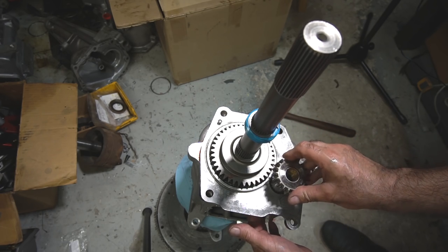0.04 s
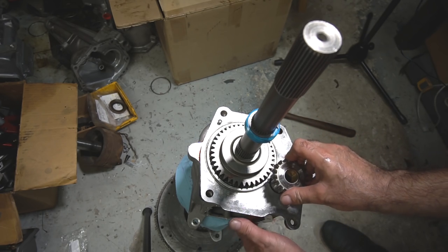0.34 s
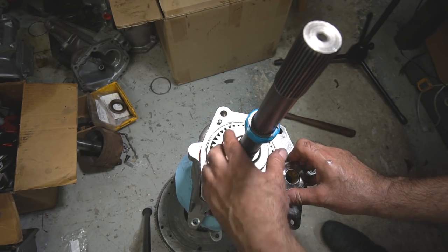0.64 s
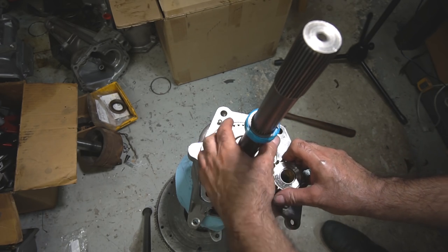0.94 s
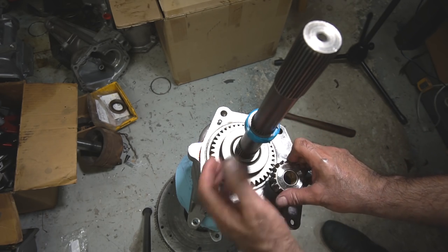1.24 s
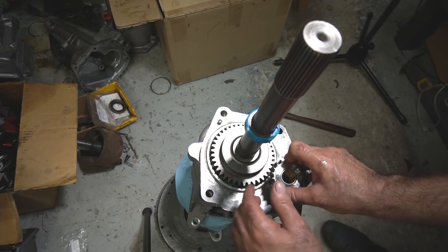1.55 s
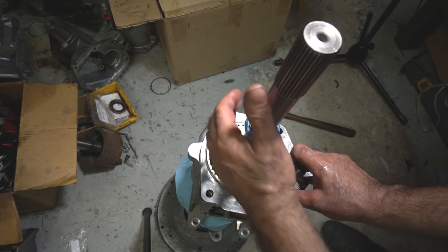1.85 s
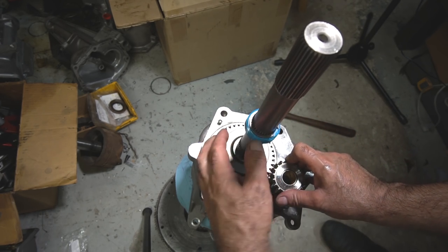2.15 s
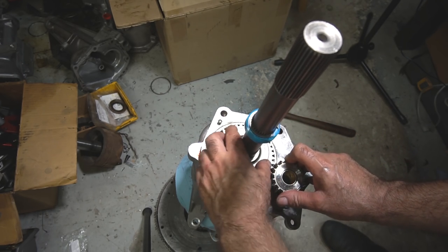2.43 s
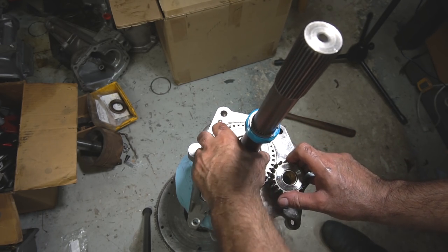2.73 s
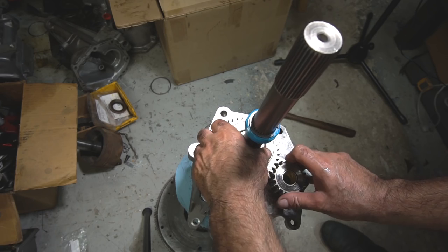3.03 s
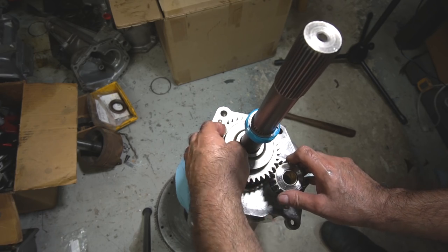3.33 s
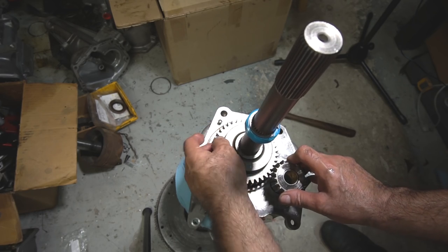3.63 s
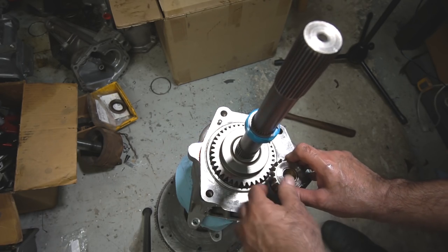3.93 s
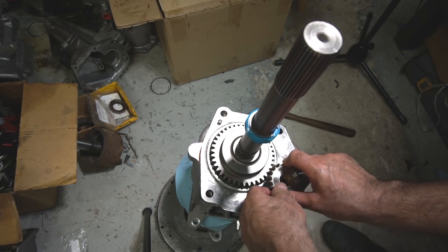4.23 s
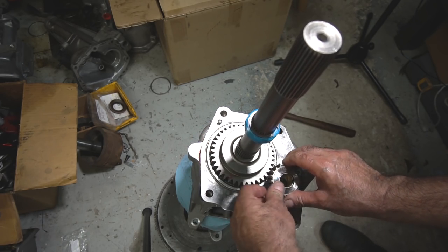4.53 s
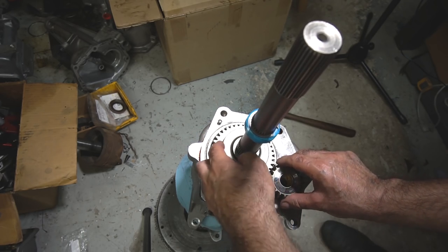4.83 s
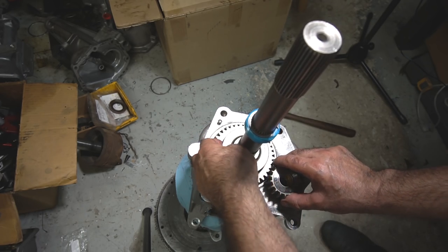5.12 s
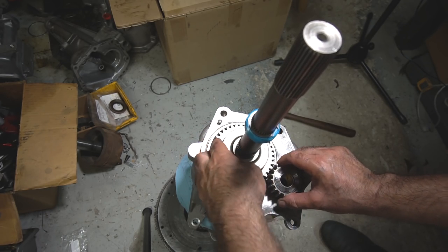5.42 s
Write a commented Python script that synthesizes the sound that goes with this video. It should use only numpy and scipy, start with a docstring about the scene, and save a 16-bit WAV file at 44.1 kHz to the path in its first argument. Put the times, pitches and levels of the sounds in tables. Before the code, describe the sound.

Close by in a quiet workshop, hands work a big steel gear and a small pinion into mesh. Teeth clack and chatter in irregular clusters, briefly ringing the metal housing, with light pings, ticks and dull bumps between. Midway the gear scrapes along its shaft amid a flurry of knocks. The two loudest clacks follow with a faint chime, then a few lighter knocks, over a low hush of air.

```python
"""A short scrape and a flurry of steel knocks, close by: hands work a big gear and a small pinion into mesh.
Teeth clack and chatter, ringing the cast housing and thudding in its stand; the pinion pings, tips tick.
The big gear grinds along its shaft in tiny slips and chimes faintly, shorter when a palm lies on it.
Hands rumble, bump and rub on the metal. The workshop answers the harder knocks over a low hush of air."""
import sys
import numpy as np
from scipy import signal
from scipy.fft import rfft, irfft, next_fast_len
from scipy.io import wavfile

SR = 44100
rng = np.random.default_rng(int(sys.argv[2]) if len(sys.argv) > 2 else 0)


def unload_wav(signal):
    """Save mono or channel-first audio to the path in sys.argv[1] as 16-bit WAV at rate SR, clipped to [-1, 1]."""
    wavfile.write(
        sys.argv[1],
        SR,
        np.round(np.clip(np.atleast_2d(signal).T, -1, 1) * 32767).astype(np.int16),
    )


N = 250047
TIME = np.arange(N) / SR
BLOW = TIME[:SR // 2]   # time since a contact [s]

# modes of the housing's walls (frequency [Hz], level [dB], t60 [s])
HOUSING_MODES = [(752, 1, 0.23), (922, 12.5, 0.029), (1020, -3, 0.14), (1122, 2.5, 0.053),
                 (1182, 7.5, 0.0086), (1370, -16, 0.084), (1596, 5.5, 0.056), (1842, -7.5, 0.069),
                 (2310, -36, 0.048), (2217, 9, 0.019), (2780, -6, 0.15), (3070, -12, 0.062),
                 (3920, 13, 0.026), (4094, 11, 0.042), (4850, 3, 0.034), (5500, -18, .04)]
# modes of the big gear (frequency [Hz], level [dB], t60 [s])
GEAR_MODES = [(6385, 8.5, 0.16), (6470, -6.5, 0.4), (10300, -2, 0.13), (10130, -13, 0.4), (12305, -1, 0.47),
              (12330, -9, 0.43), (13980, -18, .35), (14545, -23, .3)]


def from_db(db):
    """Decibels to gain."""
    return 10 ** (np.asarray(db) / 20)


def rms_one(x, span_s=None):
    """Scale to rms 1, judged over the first span_s if given."""
    head = x if span_s is None else x[:int(span_s * SR)]
    return x / np.sqrt(np.mean(head ** 2) + 1e-20)


def unit(x):
    """Scale to energy 1."""
    return x / np.sqrt(np.sum(x ** 2) + 1e-20)


def add(track, s, sound):
    """Mix a sound in at time s."""
    at = max(int(s * SR), 0)
    track[at:at + len(sound)] += sound[:N - at]


def through(x, response):
    """Play x through an impulse response."""
    return signal.fftconvolve(x, response)[:len(x)]


def colour(x, spectrum):
    """Shape x with an EQ curve, rolled off below its first point; rms 1."""
    hz, db = np.transpose(spectrum)
    grid = np.fft.rfftfreq(next_fast_len(len(x)) * 2, 1 / SR) + 1
    gain = from_db(np.interp(np.log(grid), np.log(hz), db)) * np.minimum(grid / hz[0], 1) ** 2
    return rms_one(irfft(rfft(x, 2 * len(grid) - 2) * gain)[:len(x)])


def band(x, low_hz, high_hz, order=4):
    """Keep the band between two edges."""
    sos = signal.butter(order, [low_hz, min(high_hz, .45 * SR)], "band", fs=SR, output="sos")
    return signal.sosfilt(sos, x + 1e-18)


def resonate(x, hz, width_hz):
    """A two-pole resonance."""
    r = np.exp(-np.pi * width_hz / SR)
    feedback = [1, -2 * r * np.cos(2 * np.pi * hz / SR), r * r]
    return signal.lfilter([(1 - r * r) / 2, 0, (r * r - 1) / 2], feedback, x + 1e-18)


def fade(t60, t=BLOW):
    """Exponential decay, 60 dB down after t60 seconds."""
    return np.exp(-np.log(1000) * t / max(t60, 1e-4))


def ring(modes, tilt_db=0):
    """Struck modes, tilted by tilt_db per octave; each blow lands elsewhere and shifts their balance."""
    chance = rng.standard_normal((len(modes), 2))
    out = 0
    for (hz, db, t60), (stray, polarity) in zip(modes, chance):
        gain = from_db(db + 2 * stray + tilt_db * np.log2(hz / modes[0][0])) * np.sign(polarity)
        out += gain * fade(t60) * np.sin(2 * np.pi * hz * BLOW)
    return unit(out)


def rattle(t60):
    """A crowd of close modes dying together."""
    return unit(rng.standard_normal(len(BLOW)) * fade(t60))


def pulse(hz, width_hz):
    """A contact: damped cycles that swell and die, briefer as the band widens."""
    return unit(resonate(resonate(signal.unit_impulse(len(BLOW)), hz, width_hz), hz, width_hz))


def grains(per_s, spread_db):
    """Tiny slips at random moments, their sizes scattered by spread_db."""
    return (rng.random(N) < per_s / SR) * rng.choice([-1, 1], N) * from_db(spread_db * rng.standard_normal(N))


def arch(s, length_s, power):
    """A movement of the hand speeds up and slows down again."""
    phase = np.clip((TIME - s) / length_s, 0, 1)
    return np.sin(np.pi * phase) ** power


def gear_slide():
    """The bore drags over the shaft in many small slips; the casing drones and the gear sings faintly."""
    # pushes along the shaft (start [s], length [s], grind level [dB], drone level [dB])
    strokes = [(0, 0.053, -42.5, -42), (0.947, 0.13, -45, -43), (2.84, 0.12, -29, -38),
               (2.901, 0.11, -28, -35.5), (3.483, 0.09, -44.5, -34.5), (3.561, 0.051, -41, -33.5),
               (3.768, 0.096, -35.5, -33.5)]
    # tone of the grinding bore and of the droning casing (frequency [Hz], level [dB])
    grind_eq = [(450, -3), (650, -9), (950, -0.5), (1300, -4), (1750, -3.5), (2300, -14.5), (3200, -28.5),
                (5000, -32), (9000, -45), (16000, -50)]
    drone_eq = [(120, -19), (210, -12.5), (290, 0.5), (340, 7), (420, -3.5), (560, -14.5), (1000, -10),
                (1800, -25), (3000, -29), (6000, -52)]
    drag = sum(from_db(db) * arch(s, length_s, power=1.8) for s, length_s, db, _ in strokes)
    shake = sum(from_db(db) * arch(s, length_s, power=0.8) for s, length_s, _, db in strokes)
    slips = grains(7000, spread_db=2.5)
    walls = through(slips, ring(HOUSING_MODES))
    grind = colour(slips, grind_eq) + from_db(-8.5) * colour(walls, grind_eq)
    drone = colour(grains(4000, spread_db=2.5), drone_eq)
    # firm dragging wakes the gear's lowest modes and chokes its highest
    loose = 1 / (1 + (drag / from_db(-32.5)) ** 2)
    low_song = through(drag * rms_one(slips), ring(GEAR_MODES, tilt_db=-18))
    high_song = through(loose * shake * rms_one(slips), ring(GEAR_MODES, tilt_db=16))
    return drag * grind + shake * drone + from_db(-28) * low_song + from_db(-39) * high_song


def hands():
    """Fingers nudge the casing into a rumble and skin rubs over oily steel."""
    # swell of the rumble under the grip (time [s], relative level [dB])
    grip = [(0.0, -46.5), (0.12, -51), (0.98, -57), (1.2, -50.5), (1.37, -63.5), (2.59, -64), (2.91, -48),
            (3.14, -69), (3.38, -68), (3.92, -42), (4.56, -59.5), (5.26, -63), (5.54, -59.5), (5.67, -60)]
    # strokes of skin on steel (start [s], length [s], level [dB])
    rubs = [(.74, 0.11, -65.5), (0.922, 0.15, -57), (2.397, 0.35, -60.5), (3.29, 0.055, -54),
            (4.97, 0.23, -61)]
    # tone of the rumbling casing and of the rubbing skin (frequency [Hz], level [dB])
    rumble_eq = [(120, -43.5), (210, -8.5), (290, -7.5), (340, 0.5), (410, -8), (520, -15.5), (1000, -19.5),
                 (1700, -24), (3000, -30), (6000, -55)]
    skin_eq = [(1000, -7), (2000, 8.5), (3500, 3), (6000, -3.5), (10000, -1.5), (16000, -21)]
    grip_db = np.interp(TIME, *np.transpose(grip))
    rumble = from_db(grip_db + 1.5) * colour(grains(900, spread_db=0), rumble_eq)
    rubbing = sum(from_db(db) * arch(s, length_s, power=.9) for s, length_s, db in rubs)
    return rumble + rubbing * colour(grains(2700, spread_db=6.5), skin_eq)


def still_air():
    """The workshop's steady, bass-heavy hush."""
    # room tone (frequency [Hz], level [dB])
    air_eq = [(12, -68), (20, 8), (65, -4), (138, -14), (216, -21.5), (357, -20), (624, -26), (738, -32),
              (873, -29), (1290, -30.5), (1440, -32.5), (1860, -32.5), (2750, -38), (3740, -38),
              (16000, -44)]
    return from_db(-45.5) * colour(rng.standard_normal(N), air_eq)


def chatter(length_s, skips):
    """A clean blow is one touch; a glancing one skips several times within length_s."""
    touches = signal.unit_impulse(len(BLOW))
    jitter = rng.random(skips)
    sizes = rng.uniform(1.0, 1.3, skips) * rng.choice([-1, 1], skips)
    if length_s > .001:
        skip_s = (np.arange(skips) + jitter) / skips * length_s
        touches[(skip_s * SR).astype(int) + 1] = sizes
    return touches


def strike(touches, hz, width_hz, modes_db, crowd_db, crowd_t60):
    """Contact pulses and the housing ringing after them."""
    contact = unit(through(touches, pulse(hz, width_hz)))
    modes = unit(through(contact, ring(HOUSING_MODES)))
    crowd = unit(through(contact, rattle(crowd_t60)))
    return contact + from_db(modes_db) * modes + from_db(crowd_db) * crowd


def palm_on_gear(s):
    """Whether a palm muffles the big gear at time s."""
    # spells under the palm (start [s], end [s])
    holds = [(.7, 1.08), (1.7, 3.75), (4.7, 5.67)]
    return any(start <= s < end for start, end in holds)


def tooth_knocks():
    """Steel teeth collide with a clack, a bite, a crack and a thud; returns direct sound and room send."""
    # tooth on tooth (time [s], clack level [dB], pitch [Hz], bandwidth [Hz],
    # hardness as bite over clack [dB], weight as thud over clack [dB], chatter length [s])
    blows = [(.007, -38, 1780, 1200, -18, -18, .0056), (.041, -32.5, 1380, 1800, -12, -7.5, 0.006),
             (0.0471, -25.5, 1620, 1800, -5.5, -14, 0.0072), (0.0531, -20.5, 1700, 1720, -33, -19, 0.0038),
             (.06, -29.5, 2150, 1200, -10, -16.5, 0.0024), (.183, -43, 1530, 1500, -30, 0, 0.012),
             (.297, -25, 1400, 905, -17.5, -15, .0038), (.656, -50, 1330, 1200, -27, 1, 0.0049),
             (.807, -51.5, 1530, 1200, -26, -1, .0061), (0.957, -41, 1510, 1400, -30, -8, .01),
             (0.971, -41, 1880, 1500, -13, -4.5, 0.012), (1.018, -32, 1700, 600, -23, -11.5, 0.013),
             (1.115, -32, 1740, 940, -10.5, -12.5, 0.0074), (1.202, -35, 1970, 1800, -3, -7, .0077),
             (1.209, -33, 1490, 1600, -24, -3.5, .007), (1.376, -53, 1310, 1800, 2, 6.5, 0),
             (1.53, -49.5, 1490, 1200, -19, 2.5, 0.012), (1.816, -61, 1500, 1500, -12, -10, 0),
             (1.848, -55.5, 1340, 1400, -22, -21, 0), (2.074, -52, 1210, 1800, -13, -10, 0.00071),
             (2.192, -48.5, 845, 1400, -30, -0.5, 0.00087), (2.428, -51, 1840, 1400, -13, -23, 0.0028),
             (2.629, -56, 1850, 1800, -2.5, 6, 0.022), (2.797, -46.5, 1710, 1800, -5, -1, 0),
             (2.895, -29, 1490, 1400, -23, -13, .0047), (2.926, -26, 1270, 1100, -23, -9, 0.013),
             (2.938, -22, 2180, 1800, -11, -14, 0), (2.948, -41, 1860, 1800, 2.5, 4, 0.0066),
             (3.569, -36.5, 1050, 1200, -24.5, -6, .0095), (3.686, -41.5, 1390, 1400, -22.5, -3, 0.0037),
             (3.825, -40, 1510, 1500, -11, 2, 0.0096), (3.867, -35.5, 1750, 1000, -23.5, -0.5, 0.0005),
             (3.8862, -9, 1846, 1700, -11.5, -12, 0), (4.086, -21, 1670, 1300, -8, -11, 0.0027),
             (4.093, -31.5, 1660, 1200, -7.5, -0.5, .012), (4.295, -29, 1790, 1700, -7, -7.5, 0.013),
             (4.318, -32.5, 1770, 1600, -5.5, -5, .0032), (4.3319, -12.5, 1900, 1113, -17, -13, 0),
             (4.83, -52.5, 1910, 900, -7, -11, 0.0015), (5.265, -51, 2070, 2200, -6, 5, 0),
             (5.337, -33, 1230, 1500, -6, -7.5, 0.01), (5.4013, -24, 1500, 810, -27, -7.5, 0.0032)]
    # low modes of the casing on its stand (frequency [Hz], level [dB], t60 [s])
    casing_modes = [(55, -29, .6), (225, 0, 0.083), (278, -8, 0.09), (347.2, 1, 0.087), (393.5, -9.5, 0.12),
                    (423, -6.5, 0.044)]
    direct, send = np.zeros(N), np.zeros(N)
    attack_s, swing_s = .008, .02
    for s, clack_db, hz, width_hz, hardness_db, weight_db, chatter_s in blows:
        # against a usual knock of -30 dB and 1500 Hz width: hard, brief ones crack, strong ones fill the room
        force_db, briefness = clack_db + 30, np.log2(width_hz / 1500)
        crack_db = -12.5 + 0.83 * hardness_db + 4.5 * briefness
        send_db = -10 + 0.12 * force_db - briefness - 3 * palm_on_gear(s)
        touches = chatter(chatter_s, skips=4)
        clack = strike(touches, hz, width_hz, modes_db=-7, crowd_db=-6.5, crowd_t60=0.09)
        clack = band(clack, 320, 1.52 * hz)   # the time the faces stay in touch sets the top edge
        bite = strike(touches, 2470, width_hz=6300, modes_db=-12, crowd_db=-1, crowd_t60=0.038)
        bite = band(bite, 2750, 5300)
        crack = through(touches, pulse(6460, width_hz=3100) + from_db(6) * rattle(.035))
        crack = resonate(band(crack, 4400, 21000), 5960, width_hz=5600)
        thud = through(pulse(222, width_hz=525), ring(casing_modes) + from_db(11.5) * rattle(0.041))
        knock = from_db(clack_db) * (rms_one(clack, attack_s)
                                     + from_db(hardness_db) * rms_one(bite, attack_s)
                                     + from_db(crack_db) * rms_one(crack, attack_s)
                                     + from_db(weight_db) * rms_one(thud, swing_s))
        add(direct, s, knock)
        add(send, s, from_db(send_db) * knock)
    return direct, send


def workshop(x, build_s):
    """Diffuse reflections build up and die away, soonest at the very top."""
    # the room's reverb (frequency [Hz], level [dB], t60 [s])
    reverb = [(100, 23, 0.55), (301, -13, 0.35), (737, 11, 0.45), (1760, -11.5, 0.74), (3030, 4.5, 0.48),
              (5130, -4.5, 0.6), (8000, 1, 0.75), (16200, 4, 0.12)]
    hz, db, t60 = np.transpose(reverb)
    t, edges_hz = TIME[:SR], np.geomspace(70, 18000, 13)
    tail = 0
    for low, high in zip(edges_hz, edges_hz[1:]):
        reflections = band(rng.standard_normal(SR), low, high, order=2)
        log_centre = np.log(low * high) / 2
        gain = from_db(np.interp(log_centre, np.log(hz), db))
        tail += reflections * gain * fade(np.interp(log_centre, np.log(hz), t60), t)
    onset = 1 - np.exp(-(t / build_s) ** 2)
    return through(x, unit(tail * onset))


def pings_and_chimes():
    """The pinion pings briefly; the big gear's paired modes beat as they die. A palm shortens both."""
    # blows that ring the pinion and the big gear (time [s], level [dB], tilt [dB/octave])
    pings = [(.049, -36.5, -5), (.297, -53.5, 9), (1.018, -57, 16), (1.115, -53, -10), (1.204, -42, 0),
             (4.086, -43.5, -6), (4.296, -36.5, -14), (5.338, -72, -6)]
    chimes = [(2.938, -36, 6), (3.505, -59, 14), (3.603, -60.5, 8.5), (3.886, -38, 6), (4.332, -53, 7)]
    # modes of the pinion (frequency [Hz], level [dB], t60 [s])
    pinion_modes = [(7450, -13, 0.19), (7660, 0, 0.075), (7910, -10, 0.15), (10830, -3.5, 0.064),
                    (11530, -2.5, 0.047), (11740, -4, 0.069)]
    out = np.zeros(N)
    for blows, modes in (chimes, GEAR_MODES), (pings, pinion_modes):
        for s, db, tilt_db in blows:
            damping = fade(t60=0.7) if palm_on_gear(s) else 1
            add(out, s, from_db(db) * rms_one(ring(modes, tilt_db) * damping, span_s=.008))
    return out


def palm_bumps():
    """Each cushioned bump wakes a single low resonance of the casing or its stand."""
    # soft bumps (time [s], pitch [Hz], peak level [dB])
    bumps = [(.189, 318, -32), (0.442, 326, -35), (.819, 345, -37), (1.031, 318, -31), (1.212, 310, -23.5),
             (1.212, 208, -27), (1.236, 232, -38), (1.337, 313, -33.5), (1.347, 338, -38),
             (1.909, 323, -43.5), (2.81, 353, -42), (3.725, 342, -31.5), (3.915, 77.5, -35),
             (3.962, 85, -35), (4.035, 220, -20.5), (4.062, 235, -31), (4.094, 223, -38), (4.104, 65, -37),
             (4.228, 59, -34), (4.307, 248, -23.5), (4.511, 323, -40), (5.638, 335, -40.5)]
    out = np.zeros(N)
    for s, hz, db in bumps:
        bump = pulse(hz, width_hz=75)
        add(out, s - .002, from_db(db) * bump / np.abs(bump).max())
    return out


def tip_ticks():
    """Tooth tips touch too lightly to wake the housing."""
    # light touches (time [s], pitch [Hz], level [dB])
    ticks = [(0.767, 5900, -57), (1.1594, 8300, -45), (1.1625, 7300, -46), (1.17, 5300, -44.5),
             (1.288, 10300, -34.5), (2.328, 6800, -54), (3.603, 5740, -35), (4.2615, 6750, -31),
             (4.6595, 8500, -52), (4.919, 7100, -49), (5.1212, 7700, -49), (5.266, 5800, -44.5),
             (5.464, 5240, -55.5)]
    out = np.zeros(N)
    for s, hz, db in ticks:
        contact = pulse(hz, width_hz=7200)
        snap = from_db(-13) * unit(through(contact, rattle(0.0064)))
        tail = from_db(-6) * unit(through(contact, rattle(0.063)))
        add(out, s, from_db(db) * rms_one(contact + snap + tail, span_s=0.0018))
    return out


def edge_tinks():
    """A tooth edge catches and sounds one short, bright resonance."""
    # catches (time [s], pitch [Hz], peak level [dB])
    tinks = [(2.939, 5040, -21.5), (3.8225, 4950, -29)]
    out = np.zeros(N)
    for s, hz, db in tinks:
        tink = pulse(hz, width_hz=360)
        add(out, s, from_db(db) * tink / np.abs(tink).max())
    return out


def scene():
    """Knocks, light contacts and friction, with their reverb and the still air, in mono."""
    knocks, knock_send = tooth_knocks()
    light = tip_ticks() + palm_bumps() + edge_tinks() + pings_and_chimes()
    friction = gear_slide() + hands()
    room = workshop(knock_send + from_db(-17.5) * light + from_db(-15.5) * friction, build_s=0.01)
    return (knocks + light + friction + room + still_air())[None]


def record(dry):
    """Soft saturation rounds the highest peaks; a steep low-pass cuts the top at 16 kHz."""
    return signal.sosfilt(signal.ellip(10, .2, 70, 16000, fs=SR, output="sos"), np.tanh(dry))


dry = scene()
out = record(dry)
unload_wav(out)
```